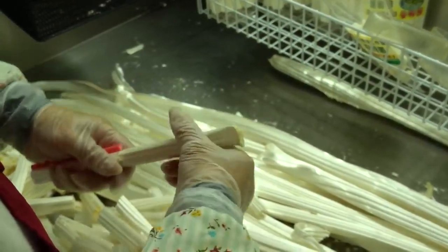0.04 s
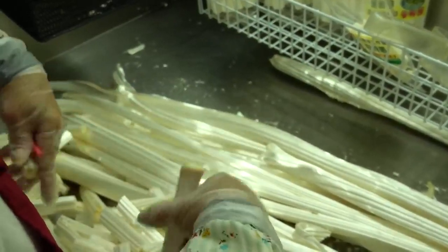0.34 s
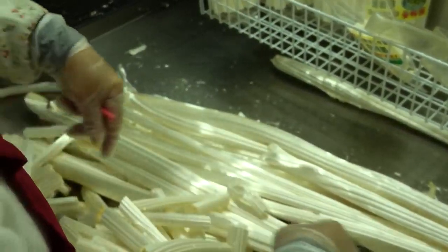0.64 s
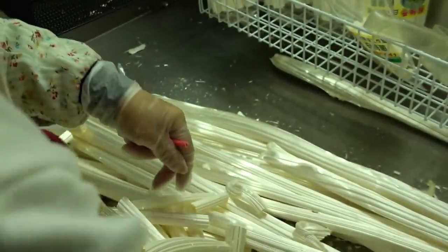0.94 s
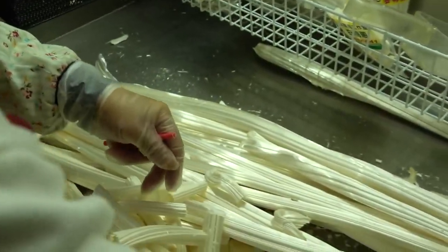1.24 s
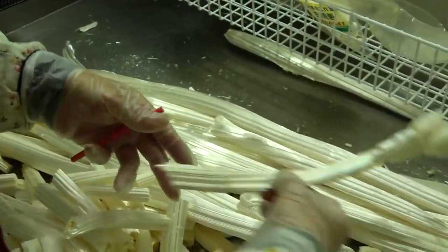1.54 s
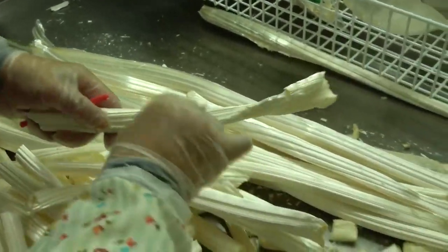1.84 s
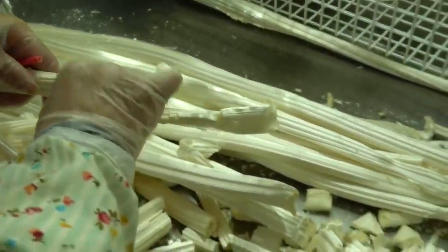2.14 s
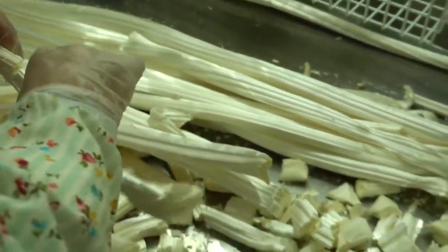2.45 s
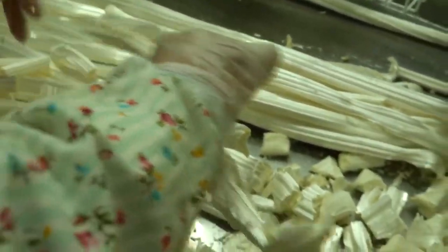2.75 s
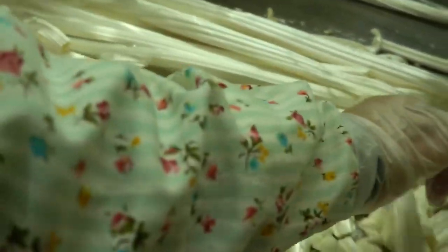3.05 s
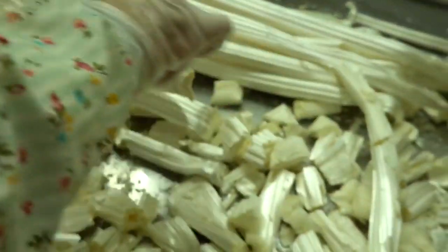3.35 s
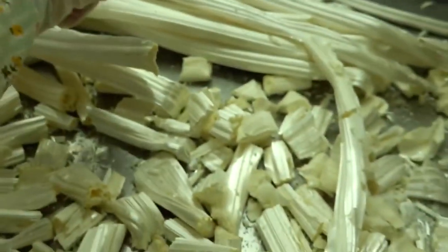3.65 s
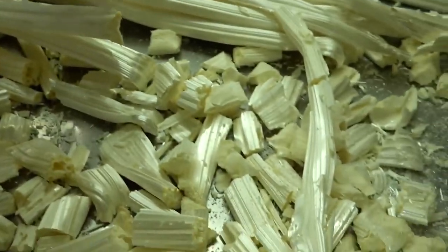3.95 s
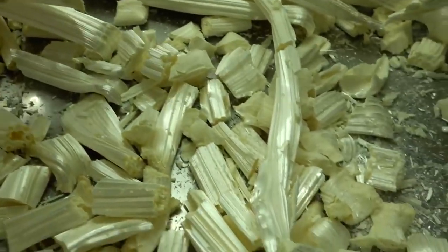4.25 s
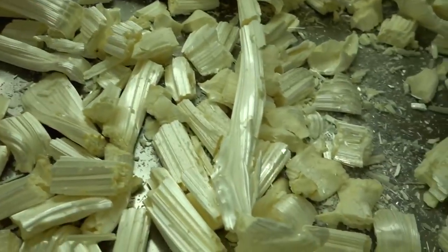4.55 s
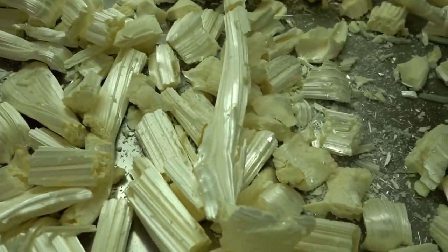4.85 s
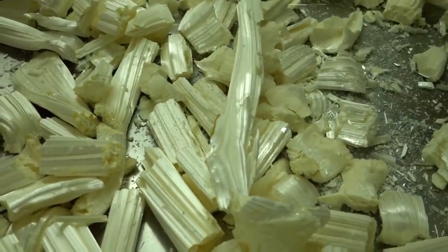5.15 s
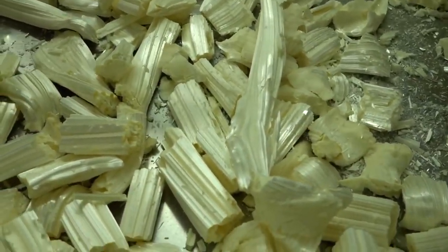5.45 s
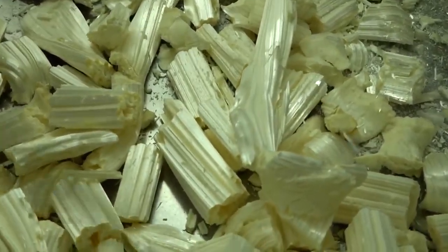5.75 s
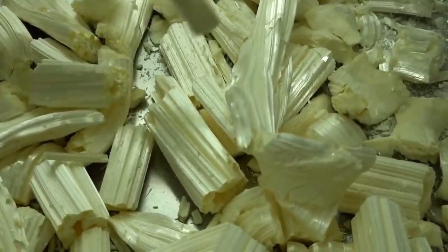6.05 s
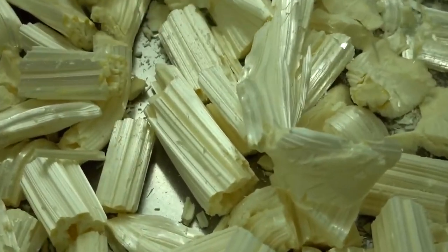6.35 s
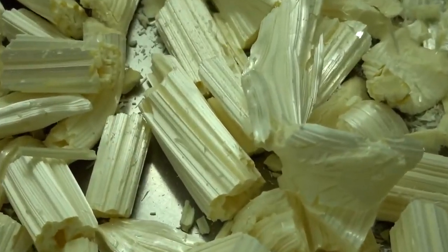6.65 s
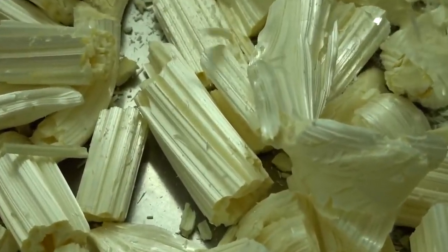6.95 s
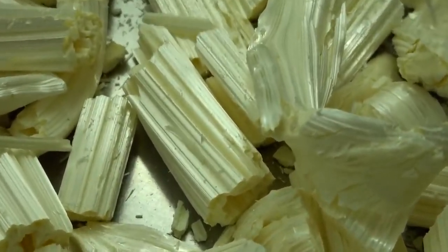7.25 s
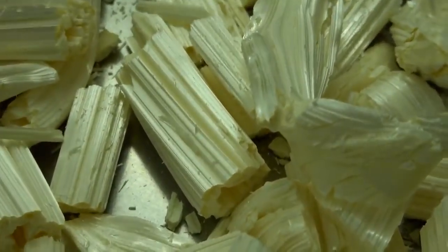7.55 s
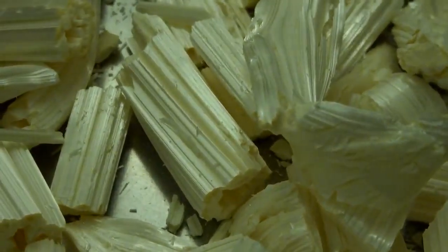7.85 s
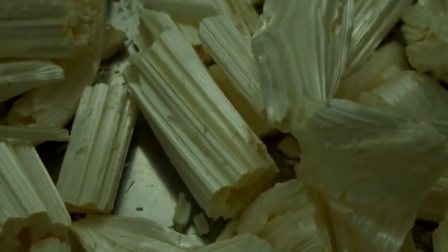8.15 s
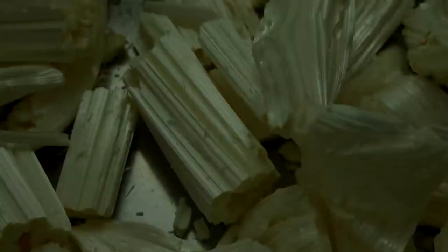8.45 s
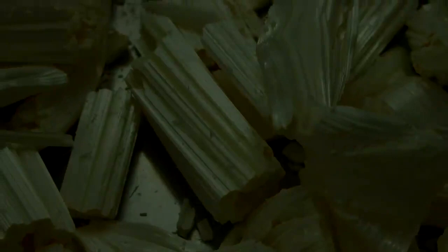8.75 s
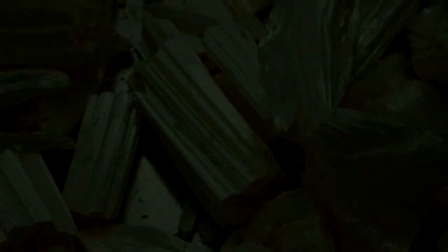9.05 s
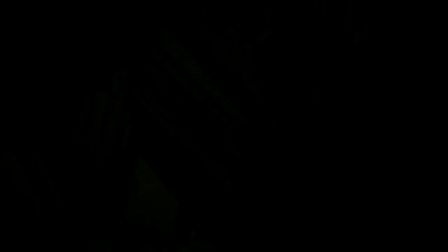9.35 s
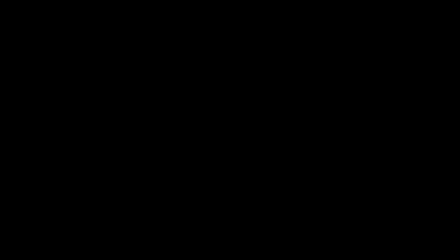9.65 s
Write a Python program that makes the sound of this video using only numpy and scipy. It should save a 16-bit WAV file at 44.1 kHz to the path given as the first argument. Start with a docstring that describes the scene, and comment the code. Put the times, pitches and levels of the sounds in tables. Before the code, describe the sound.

Hands break hollow strands of hard candy over a steel table, heard close up in a small workroom with faint, steady ventilation. Dry, bright crackling runs for the whole ten seconds in short, uneven bursts, each a swarm of tiny breaks, with sharp snaps as whole strands give way. At about 0.6 seconds several sticks clatter onto the steel, which thuds briefly. Snaps and lighter knocks follow from 1.3 to 2.5 seconds. Between 3 and 4 seconds pieces land with clinks and low thumps, the heap shifts, and a dragged strand gives a brief, thin ringing scrape. The snapping is densest from about 5 to 8 seconds, with more landings around 6.4 and 7.3. From 8 seconds on, scattered knocks and a soft rumble of rolling sticks mix with crunching, which eases towards the end.

```python
"""A dry, brittle crunch: hands crack strands of pulled candy on a steel table in a small workroom.
Each squeeze builds, holds and dies away in a swarm of tiny breaks; now and then a whole strand snaps.
Dropped sticks knock on the table top, which booms briefly, stir the heap and roll on.
The heap is pushed about, and a hollow strand sings as it is dragged. Faint ventilation lies underneath.
Two closely spaced microphone ports listen from just above the heap."""
import sys
import numpy as np
from scipy import signal
from scipy.fft import rfft, irfft
from scipy.io import wavfile
from scipy.ndimage import uniform_filter1d

SR = 44100
rng = np.random.default_rng(int(sys.argv[2]) if len(sys.argv) > 2 else 0)


def generate_wav(sig):
    """Save sig (samples, or channels by samples) to the path in sys.argv[1] as 16-bit PCM at SR."""
    pcm = np.round(np.clip(np.atleast_2d(sig).T, -1, 1) * 32767).astype(np.int16)
    wavfile.write(sys.argv[1], SR, pcm)


N = 432180

# Cue levels are fader settings: each layer adds its own trim and tone colour.
# bursts of crackle as the strands are squeezed, rubbed or crushed by a dropped stick:
# (start [s], build-up [s], hold [s], crackle level [dB], clatter offset from that level [dB])
CRUNCH_CUES = [(0.0, 0.0011, 0.014, -31, -8), (0.055, 0.0069, 0.0067, -38.5, -4),
               (0.143, 0.043, 0.021, -27, -8.5), (0.329, 0.017, 0.0088, -43, 2),
               (0.423, 0.0056, .012, -42, -7), (0.587, 0.031, .04, -23.5, -12.5),
               (0.816, 0.02, 0.013, -37, -6), (0.916, 0.0056, 0.019, -44, -7),
               (1.044, 0.0053, 0.026, -38, -1), (1.124, .004, 0.08, -32, -7.5),
               (1.221, 0.023, 0.049, -27, -9.5), (1.363, 0.044, 0.021, -26, -4),
               (1.549, 0.0026, 0.014, -35, 0), (1.712, 0.013, 0.12, -45, -13),
               (1.996, 0.048, 0.024, -36, -2), (2.112, 0.016, .01, -34.5, -2),
               (2.164, 0.0027, 0.031, -28, -14), (2.286, 0.026, 0.096, -26.5, -6),
               (2.45, 0.031, .01, -28, -10), (2.567, 0.024, 0.028, -32, -9),
               (2.651, 0.0075, 0.058, -30, -9), (2.756, 0.0041, 0.041, -29, -11),
               (2.968, 0.067, .035, -31, -5), (3.185, 0.0046, .015, -30, 5), (3.39, 0.0603, 0.047, -47, -1),
               (3.499, 0.068, .25, -28.5, -13.5), (3.934, 0.022, 0.0086, -26, 1.5),
               (4.024, 0.0097, 0.063, -42.5, -6), (4.221, 0.014, 0.02, -39, -16),
               (4.385, 0.044, 0.019, -39, -22.5), (4.488, .035, 0.068, -34, -8),
               (4.641, .004, 0.017, -35, -6.5), (4.792, 0.0051, 0.033, -37, -11),
               (4.872, .02, .015, -42, -8), (5.019, 0.046, 0.021, -36, -5), (5.145, 0.0049, 0.062, -36, -6),
               (5.267, 0.0032, 0.016, -31, -12), (5.41, .06, 0.1107, -43, -13),
               (5.585, .005, 0.081, -29, -12.5), (5.74, 0.041, .015, -34, -5),
               (5.843, 0.0098, .11, -34, -20), (5.978, 0.0059, 0.038, -29, -15),
               (6.055, 0.034, 0.021, -26.5, -6), (6.192, 0.029, 0.018, -43, -7),
               (6.303, .004, 0.034, -30, -12), (6.345, .02, .01, -37, 3), (6.49, 0.013, .012, -41, -16),
               (6.627, 0.03, 0.044, -29, -5), (6.723, 0.017, 0.0088, -26.5, -11),
               (6.853, 0.076, .05, -31.5, -13.5), (7.002, 0.024, 0.13, -38.5, -4.5),
               (7.262, 0.0027, 0.037, -37, -2), (7.376, 0.049, 0.029, -41, 1.5),
               (7.541, 0.0055, .04, -39, -6), (7.612, 0.0045, 0.063, -28, -7.5),
               (7.765, 0.11, 0.056, -32, -8.5), (8.072, 0.0027, 0.019, -28.5, -6),
               (8.347, 0.051, 0.057, -28.5, -14.5), (8.49, 0.063, 0.043, -31, -18),
               (8.717, .004, 0.049, -36, -2), (8.796, 0.024, 0.0096, -28.5, -4.5),
               (8.869, 0.009, 0.28, -40, -3.5), (9.146, 0.0046, 0.36, -36.5, -5),
               (9.546, 0.011, 0.027, -37, -0.5), (9.715, 0.0061, 0.025, -40, -20)]
# where the hands work: (time [s], delay at the left port [samples])
HAND_BEARING = [(0, 1.6), (2, 2.6), (5.5, 2.2), (7.6, 2.4), (8.1, .9), (9.8, .8)]
# whole strands break: (time [s], spike [dB], crumble [dB], hollow body [dB])
SNAP_CUES = [(0.182, -14, 3, -6.5), (0.24, -1, 6.5, -22), (1.124, -21, 1, -15), (1.344, -12, 5, -4),
             (1.3957, -15, 4, -5), (1.5445, -4, -13, -15), (1.645, -15.5, -1.5, -25),
             (1.9987, -25, -8.5, -17.5), (2.167, -15, 1, -4), (2.2072, -7, -11, -22), (2.3557, -9, 0, 0.5),
             (2.5331, -5.5, -2.5, -30), (2.922, -22.5, -8, -32), (3.075, -6, -21, -7),
             (3.1485, -4, -5, -15), (3.193, -4, -11, -2), (3.728, -9.5, -3.5, -19), (3.761, -10, 0, -9),
             (3.7961, -6, 5, -9), (4.187, -17, -4, -35), (4.5196, -15, 4.5, -16), (4.5407, 0.5, 5, -10),
             (4.6434, -16.5, -3, -5.5), (5.1458, -8, 0.5, -10.5), (5.1742, -9, 2, -22.5),
             (5.2064, -2.5, 0, -18), (5.2682, -2, 6.5, -6), (5.4487, -10, -6, -35),
             (5.5046, -10.5, -2, -29), (5.589, -1, 7, -4.5), (5.6437, -5, 3, -8), (5.7563, -20, 0.5, -15.5),
             (5.8419, -7, -3, -18), (5.847, -2, -16, -10), (5.8679, -7, 6.5, -23), (5.9423, -11, -3, -27),
             (5.9842, -5, 8, -24.5), (6.0534, -5.5, -2, -22), (6.0926, -4, -9, -4.5),
             (6.2299, -10, -21, -14), (6.2603, -12, 5, -18), (6.304, -11, 7.5, -17), (6.7432, -10, -3, -17),
             (6.77, -8, -16, -14.5), (6.856, -6.5, -10.5, -23), (6.8988, -6.5, -16, -16),
             (6.9441, 0, 5, -6), (7.0491, -4, 0, -17), (7.264, -10, 5.5, -11), (7.3017, -13, 0, 1),
             (7.5396, -9, -4.5, -18), (7.5771, -6, -2, -22), (7.6123, -1, -7, -13.5), (7.6344, 1, 7, -25),
             (7.7114, -6.5, -14, -30), (7.8353, -6.5, -16, -14), (7.891, -1, -14, -6),
             (7.9167, -4, -8, -24), (7.9533, -3.5, -8, -7.5), (8.0766, 0.5, -10, -5),
             (8.2143, -9, -19, -13), (8.3472, -25, -12, -13.5), (8.4849, -12, -13, -24),
             (8.719, -6, -2, -15), (9.152, -7.5, -17, -17)]
# sticks land: (time [s], clack [dB], thud [dB], clink [dB], stick pitch [Hz], thud bass gain [dB])
KNOCK_CUES = [(0.427, -28, -43.5, -51, 1900, -8), (0.609, -25.5, -35, -43, 1200, -12.5),
              (0.634, -13, -39, -44, 1050, -13.5), (0.647, -12.5, -31.5, -39, 1057, -12),
              (0.667, -19, -34, -39, 897, -10), (0.69, -22, -28.5, -45, 1240, -14),
              (0.73, -25.5, -34.5, -47, 655, -9), (1.346, -30, -43.5, -28, 687, -2),
              (1.402, -32, -51, -42, 1890, -1), (1.426, -24.5, -48, -39, 1475, 1),
              (1.444, -23, -45, -39, 1780, -3), (1.546, -32, -34.5, -19, 4140, 2),
              (1.644, -26.5, -40.5, -35, 660, -3), (2.047, -31.5, -49, -40, 693, -8),
              (3.147, -27, -40.5, -29, 3597, 1), (3.193, -18, -26.5, -20, 1757, 5.5),
              (3.211, -26, -27.5, -38, 1250, 5), (3.598, -22, -38, -30, 3760, -2),
              (3.728, -19, -35.5, -18, 3528, -2), (3.892, -13, -41.5, -16.5, 1803, 6),
              (3.945, -19.5, -43, -27, 1890, 1), (3.974, -31, -36.5, -20, 2756, 1),
              (4.186, -33, -49, -30, 621, -3.5), (4.645, -31, -39, -37, 675.7, 9),
              (6.102, -31, -48, -32.5, 2176, -7), (6.262, -35, -37.5, -28.5, 3940, -1),
              (6.304, -36, -38.5, -25, 3940, -1), (6.337, -24, -35, -26, 1900, 5),
              (6.385, -14.5, -38.5, -27, 1808, -1), (6.441, -27, -40, -29, 1460, -0.5),
              (7.069, -33, -52, -36, 641, -11), (7.266, -16, -34.5, -20, 1806, -1),
              (7.3, -26, -37, -15, 3104, 4), (7.57, -28, -47.5, -40.5, 1874, 1),
              (8.137, -17.5, -44, -39, 1556, -11), (8.397, -29.5, -36, -40, 597, -5),
              (8.513, -27, -34, -40.5, 617, -3), (8.559, -17.5, -32.5, -29, 625.5, -10),
              (8.72, -22.5, -30.5, -31, 655.4, -3), (8.833, -22.5, -32.5, -40, 1399, 0),
              (9.07, -25.5, -50, -36, 1395, 0), (9.254, -28, -26.5, -34, 610, 2.5),
              (9.557, -30, -35, -31, 3380, -1)]
# the heap is pushed across the table: (start [s], build-up [s], hold [s], level [dB])
PUSH_CUES = [(1.25, .1, .22, -42), (3.36, 0.19, .2, -42), (6.092, .01, 0.036, -48.5),
             (7.38, 0.041, 0.043, -45.5), (8.72, 0.074, 0.75, -42)]
# a long hollow strand is dragged over the heap: (start [s], length [s], level [dB])
SCRAPE_CUES = [(2.547, 0.31, -47.5), (3.786, 0.13, -39.5), (4.326, 0.19, -59)]
# modes of the loaded steel top: (frequency [Hz], width [Hz], level [dB])
STEEL_MODES = [(97.7, 9.3, -1.5), (148, 10.8, 7), (169, 14, -5.5), (197.5, 11, 0.5), (234, 28, 2),
               (303.1, 47.1, 4.5), (403, 53, 2.5), (464, 23, 5), (500, 150, -3), (602, 34, 5.5),
               (696, 77, -3), (1077, 27, 0), (1225, 200, 0), (1750, 42, -4)]
# tone colours: (frequency [Hz], level [dB])
CRACKLE_EQ = [(200, -51), (700, -40), (1500, -14.5), (3000, -3.5), (5000, 1), (7500, 1), (11000, 1),
              (16000, -3.5)]  # fine, bright breaks
CLATTER_EQ = [(150, -44), (500, -11), (900, -8.5), (1400, -0.5), (2100, 4), (3200, 2), (5000, 1.5),
              (9000, -35), (16000, -18)]  # larger pieces jostling
CLACK_EQ = [(50, -50), (150, -45), (400, -7), (750, -2), (1150, -1), (1850, 3), (2600, -4.5), (5000, -16),
            (16000, -12.5)]  # stick on steel
CLINK_EQ = [(300, -41), (1400, -30), (2500, -5.5), (4000, -2), (6000, -5.5), (10000, -21), (16000, -58)]  # stick on candy
THUD_EQ = [(25, -37), (70, -16), (140, -8.5), (300, -0.5), (600, 4), (1100, 1.5), (2200, -16.5),
           (6000, -36), (16000, -53)]  # the blow into the table
AIR_EQ = [(15, -72), (25, -46), (117, -22), (180, -21), (229, -17), (531, -12.5), (624, 2), (887, -6.5),
          (1230, -4), (1890, 3), (2550, -1), (3520, -0.5), (7110, -5), (14800, -6.5), (16000, -16)]  # ventilation
# the workroom's decay: (frequency [Hz], time to fall 60 dB [s])
REVERB_TIME = [(100, 0.98), (300, 0.42), (700, 0.51), (1800, 0.3), (5000, 0.47), (13000, 0.12)]
# its reverb send: (frequency [Hz], level [dB])
REVERB_SEND = [(100, -10), (400, -8), (1000, -5), (2500, -11), (6000, -11.5), (14000, -6)]
# how alike diffuse sound is at the two ports: (frequency [Hz], correlation [0..1])
PORT_LIKENESS = [(100, 1), (500, 0.97), (1400, 0.72), (3000, 0.76), (6000, 0.063), (16000, 0.53)]


def from_db(db):
    """Decibels to gain."""
    return 10 ** (np.asarray(db) / 20)


def rms_one(x):
    """Scale to unit power."""
    return x / np.sqrt(np.mean(x ** 2) + 1e-20)


def at_hz(points, hz):
    """Read a table on a log-frequency axis."""
    f, value = np.transpose(points)
    return np.interp(np.log(np.maximum(hz, 1)), np.log(f), value)


def add(out, s, sound):
    """Mix a sound in at s seconds."""
    start = max(round(s * SR), 0)
    out[:, start:start + sound.shape[1]] += sound[:, :max(N - start, 0)]


def coloured(x, eq, size=4096):
    """Minimum-phase EQ that keeps the power of white noise."""
    cepstrum = irfft(np.log(from_db(at_hz(eq, np.fft.rfftfreq(size, 1 / SR)))))
    cepstrum[1:size // 2] *= 2
    cepstrum[size // 2 + 1:] = 0
    response = irfft(np.exp(rfft(cepstrum)))
    return signal.oaconvolve(x, response[None] / np.linalg.norm(response), axes=1)[:, :x.shape[1]]


def resonance(x, hz, width_hz):
    """Two-pole band-pass with gain 1 at its peak."""
    r = np.exp(-np.pi * width_hz / SR)
    feedback = [1, -2 * r * np.cos(2 * np.pi * hz / SR), r * r]
    return signal.lfilter(np.array([1, 0, -1]) * (1 - r * r) / 2, feedback, x + 1e-18)


def bass_cut(x, edge_hz):
    """Roll off the low end at 12 dB an octave."""
    return signal.sosfilt(signal.butter(2, edge_hz, "high", fs=SR, output="sos"), x + 1e-18)


def evened(x, window_s):
    """Ride the gain towards unit power; single grains still stick out."""
    power = uniform_filter1d(np.mean(x ** 2, axis=0), max(int(window_s * SR), 2))
    return x / np.sqrt(np.maximum(power, 0) + np.mean(power) / 100)


def lag_at(s):
    """Left-port delay in samples for sounds at times s, scattered around the hands."""
    lag = np.interp(s, *np.transpose(HAND_BEARING)) + rng.normal(0, .6, np.shape(s))
    return np.maximum(lag, 0).round().astype(int)


def at_ports(x, lag, pan_db):
    """A sound from the right reaches the left port lag samples late; positive pan favours the left."""
    return np.array([np.pad(x, (lag, 0))[:len(x)], x]) * from_db([[pan_db / 2], [-pan_db / 2]])


def diffuse(size):
    """White stereo noise from all sides, most alike at both ports in the bass."""
    alike = np.clip(at_hz(PORT_LIKENESS, np.fft.rfftfreq(size, 1 / SR)), -1, 1)
    mid, side = rfft(rng.standard_normal((2, size)))
    return irfft(np.sqrt((1 + alike) / 2) * mid + np.sqrt((1 - alike) / 2) * side * [[1], [-1]], size)


def heap_noise(size, lag):
    """Scatter from the heap: partly from the side of the hands, partly from everywhere."""
    direct = at_ports(rng.standard_normal(size), lag, pan_db=-2.3)
    return rms_one(direct + from_db(1) * diffuse(size))


def bursts(cues, fade_db_per_s, rest_db, rise_db=13):
    """Envelope in dB: cues (start [s], build-up [s], hold [s], level [dB]) swell over a resting level."""
    power = np.zeros((1, N))
    for s, build_s, hold_s, db in cues:
        t = np.arange(int((build_s + hold_s + 50 / fade_db_per_s) * SR)) / SR
        building = rise_db * np.maximum(1 - t / max(build_s, 1 / SR), 0)
        fading = fade_db_per_s * np.maximum(t - build_s - hold_s, 0)
        add(power, s, from_db(db - building - fading)[None] ** 2)
    return 10 * np.log10(power[0] + from_db(rest_db) ** 2)


def grains(per_s, spread_db):
    """Random tiny impacts, most of them weak, a few strong."""
    sizes = from_db(spread_db * np.minimum(rng.exponential(1, N), 4))
    return (rng.random(N) < per_s / SR) * sizes * rng.choice([-1, 1], N)


def shard(hz, ring_s, ring_db, size=256):
    """Fractures, one a row: a spike and the short ring of the fragment it frees; unit energy."""
    t = np.arange(size) / SR
    ringing = np.sin(2 * np.pi * np.outer(hz, t)) * np.exp(-t / ring_s)
    sound = (t == 0) + from_db(ring_db) * ringing / np.linalg.norm(ringing, axis=1, keepdims=True)
    return sound / np.linalg.norm(sound, axis=1, keepdims=True)


def fragments(clicks, low_hz, high_hz, ring_s, ring_db, scatter_s, scatter_db, pieces=3, grips_per_s=22):
    """Each grip brings a few new pieces into play, each with its pitch; the heap scatters their sound."""
    onsets = np.flatnonzero(clicks)
    grip = np.cumsum(rng.random(N) < grips_per_s / SR)
    piece_hz = low_hz * (high_hz / low_hz) ** rng.random((grip[-1] + 1, pieces))
    hz = piece_hz[grip[onsets], rng.integers(0, pieces, len(onsets))]
    sounds = clicks[onsets, None] * shard(hz, ring_s, ring_db, size=400)
    where = onsets[:, None] + np.arange(sounds.shape[1])
    pan = from_db(rng.normal(0.14, 1, (len(onsets), 1)))
    left = np.bincount((where + lag_at(onsets / SR)[:, None]).ravel(), (sounds * pan).ravel(), N)
    right = np.bincount(where.ravel(), (sounds / pan).ravel(), N)
    decay = np.exp(-2 / (scatter_s * SR))
    afterglow = np.sqrt(signal.lfilter([1 - decay], [1, -decay], clicks ** 2 + 1e-18))
    return np.array([left[:N], right[:N]]) + from_db(scatter_db) * afterglow * heap_noise(N, lag=2)


def crunch(stir_build_s=.004, stir_hold_s=.008, stir_db=-18):
    """Thin candy walls break in swarms under each squeeze and landing: the harder, the denser."""
    breaking = [(s, build_s, hold_s, db) for s, build_s, hold_s, db, _ in CRUNCH_CUES]
    jostling = [(s, build_s, hold_s, db + offset) for s, build_s, hold_s, db, offset in CRUNCH_CUES]
    for s, clack_db, _, clink_db, *_ in KNOCK_CUES:
        breaking.append((s, stir_build_s, stir_hold_s, clink_db + stir_db))
        jostling.append((s, stir_build_s, stir_hold_s, clack_db + stir_db))
    # the resting levels keep the heap ticking between bursts
    crackle_db = bursts(breaking, fade_db_per_s=215, rest_db=-56)
    clatter_db = bursts(jostling, fade_db_per_s=223, rest_db=-55.5)
    breaks_per_s = 750 * from_db(.55 * (crackle_db + 36))
    fine = fragments(grains(breaks_per_s, spread_db=4.6), low_hz=2500, high_hz=15000,
                     ring_s=.002, ring_db=-2, scatter_s=.007, scatter_db=3.5)
    coarse = fragments(grains(breaks_per_s * .4, spread_db=2.5), low_hz=1200, high_hz=4246,
                       ring_s=.0026, ring_db=-3.5, scatter_s=.017, scatter_db=.5)
    crackle = (evened(coloured(fine, CRACKLE_EQ), window_s=.054) + ticks()) * from_db(crackle_db)
    clatter = evened(coloured(coarse, CLATTER_EQ), window_s=.049) * from_db(clatter_db - 2)
    return crackle * from_db([[.6], [-.6]]) + clatter * from_db([[-1.4], [1.4]])


def ticks(per_s=30, boost_db=18):
    """Lone fibres part at random, each a dry spike that stands out of the swarm."""
    out = np.zeros((2, N))
    for s, hz, db in rng.uniform((0, 3000, -6), (N / SR, 12000, 6), (int(per_s * N / SR), 3)):
        spike = shard(hz, ring_s=.0011, ring_db=-14)[0]
        add(out, s, from_db(boost_db + db) * at_ports(spike, int(lag_at(s)), pan_db=.5))
    return coloured(out, CRACKLE_EQ)


def ventilation():
    """A faint, steady bed of moving air from all sides."""
    return from_db(-50.5) * coloured(diffuse(N), AIR_EQ)


def room(x, size=36000, bands=12, onset_s=.0012):
    """The workroom answers with a diffuse tail that lingers longest in the bass."""
    t, hz = np.arange(size) / SR, np.fft.rfftfreq(size, 1 / SR)
    noise, tail = rfft(diffuse(size)), 0
    centres = np.geomspace(80, 16000, bands)
    for k, centre in enumerate(centres):
        share = at_hz(np.column_stack([centres, np.arange(bands) == k]), hz)
        band = irfft(noise * share, size)
        fade = from_db(-60 * t / at_hz(REVERB_TIME, centre)) * (1 - np.exp(-t / onset_s))
        tail = tail + band * fade / np.linalg.norm(fade) * from_db(at_hz(REVERB_SEND, centre))
    return signal.fftconvolve(x, tail, axes=1)[:, :N]


def snaps(size=2400):
    """A whole strand gives way with one sharp spike, then crumbles for a few milliseconds."""
    treble, body = np.zeros((2, 2, N))
    t = np.arange(size) / SR
    fade = np.exp(-t / .0064) + .15 * np.exp(-t / .031)
    for s, spike_db, crumble_db, body_db in SNAP_CUES:
        lag = int(lag_at(s))
        spike = shard(rng.uniform(2820, 11960), ring_s=.002, ring_db=-5.5)[0]
        crumble = heap_noise(size, lag) * fade / np.linalg.norm(fade)
        add(treble, s, from_db(spike_db + 2) * at_ports(spike, lag, pan_db=-1))
        add(treble, s, from_db(crumble_db - 3.5) * crumble)
        add(body, s, from_db(body_db + 2) * crumble)
    return bass_cut(coloured(treble, CRACKLE_EQ) + coloured(body, CLATTER_EQ), edge_hz=390)


def chatter(decay_s, spread_db, size=8000):
    """A stick lands hard, then in a quick run of contacts that dies away."""
    t = np.arange(size) / SR
    fade = np.exp(-t / decay_s) + 1.14 * np.exp(-t / .0018)
    contacts = rng.standard_normal(size) * from_db(spread_db * rng.standard_normal(size)) * fade
    return contacts / np.linalg.norm(contacts) * np.linalg.norm(fade)


def with_bass(x, db, shelf_hz=260):
    """Low shelf: the weight of a blow depends on where the sheet is hit."""
    bass = signal.sosfilt(signal.butter(1, shelf_hz, fs=SR, output="sos"), x)
    return x + (from_db(db) - 1) * bass


def stick(hz, ring_s, overtone_db, size=5000):
    """A struck stick rings in its first two bending modes."""
    t = np.arange(size) / SR
    fundamental = np.sin(2 * np.pi * hz * t) * np.exp(-t / ring_s)
    overtone = np.sin(2 * np.pi * 2.76 * hz * t) * np.exp(-2 * t / ring_s)
    return np.sqrt(2) * (fundamental + from_db(overtone_db) * overtone)


def table_top(x):
    """The steel sheet passes a blow on and rings in its modes."""
    modes = sum((-1) ** k * from_db(db) * resonance(x, hz, width)
                for k, (hz, width, db) in enumerate(STEEL_MODES))
    return from_db(-3) * x + from_db(5.5) * modes


def knocks(clack_decay_s=.013):
    """Each landing clacks on the steel, thuds in the table, clinks in the heap and rings the stick."""
    clack, thud, clink, ring = np.zeros((4, 2, N))
    for s, clack_db, thud_db, clink_db, hz, bass_db in KNOCK_CUES:
        lag = int(lag_at(s))
        on_steel = chatter(clack_decay_s, spread_db=2.5)
        blow = with_bass(chatter(2 * clack_decay_s, spread_db=3), bass_db)
        on_candy = chatter(.87 * clack_decay_s, spread_db=8)
        note = stick(hz, ring_s=.009, overtone_db=-14)
        add(clack, s, from_db(clack_db - 12) * at_ports(on_steel, lag, pan_db=-2.5))
        add(thud, s, from_db(thud_db - 5.5) * at_ports(blow, lag=0, pan_db=-.4))
        add(clink, s, from_db(clink_db - 7) * at_ports(on_candy, lag, pan_db=-1))
        add(ring, s, from_db(max(clack_db, clink_db - 2) - 9) * at_ports(note, lag, pan_db=-3))
    candy = bass_cut(ring + coloured(clink, CLINK_EQ), edge_hz=380)
    steel = bass_cut(coloured(clack, CLACK_EQ), edge_hz=280)
    boom = table_top(coloured(thud, THUD_EQ) + from_db(-8.5) * steel)
    return candy + steel + boom


def rolling(build_s=.037, hold_s=.008):
    """Sticks roll after each landing and when pushed, tapping the table softly, never quite at rest."""
    landings = [(s, build_s, hold_s, thud_db - 11.5) for s, _, thud_db, *_ in KNOCK_CUES]
    level_db = bursts(PUSH_CUES + landings, fade_db_per_s=63, rest_db=-61.5)
    taps = at_ports(grains(per_s=260, spread_db=3), lag=1, pan_db=.2)
    rumble = table_top(coloured(taps, THUD_EQ))
    return evened(rumble, window_s=.17) * from_db(level_db - 6)


def scrapes():
    """Rubbing keeps a long hollow strand singing in one resonance."""
    t = np.arange(N) / SR
    strokes = sum(from_db(db) * np.interp(t, [s, s + length / 10, s + length / 2, s + length], [0, 1, 1, 0])
                  for s, length, db in SCRAPE_CUES)
    return strokes * rms_one(resonance(heap_noise(N, lag=2), hz=2182, width_hz=57))


def scene():
    """Candy and table in the room, over faint ventilation noise."""
    candy = bass_cut(crunch() + snaps() + scrapes(), edge_hz=310)  # small pieces radiate little bass
    work = candy + knocks() + rolling()
    return ventilation() + from_db(.5) * (work + room(work))


def record(dry):
    """The small microphone loses the deep bass and rounds the tallest peaks; the top is cut steeply."""
    ceiling, cutoff_hz = .75, 15950
    rounded = ceiling * np.tanh(bass_cut(dry, edge_hz=55) / ceiling)
    return signal.sosfilt(signal.ellip(12, .1, 70, cutoff_hz, fs=SR, output="sos"), rounded)


dry = scene()
out = record(dry)
generate_wav(out)
```